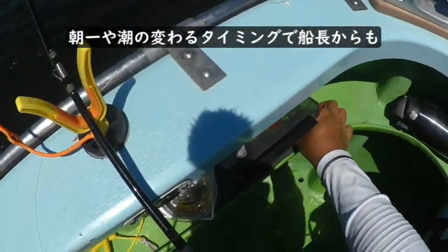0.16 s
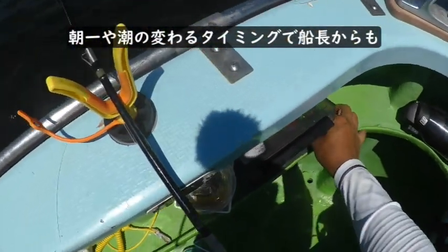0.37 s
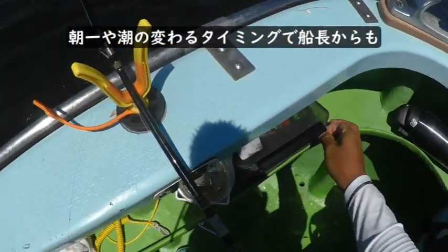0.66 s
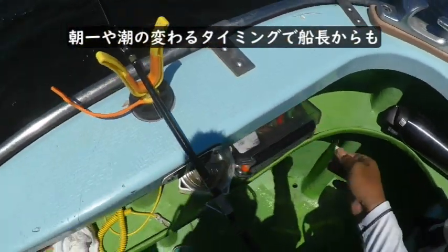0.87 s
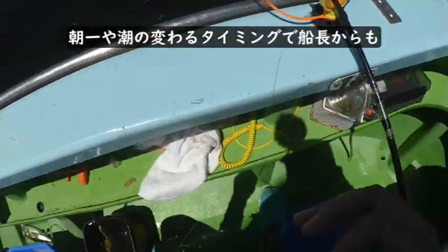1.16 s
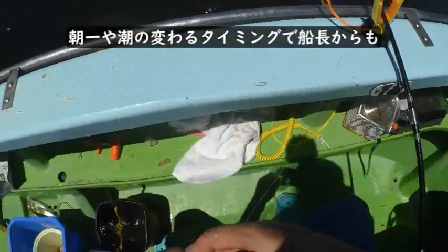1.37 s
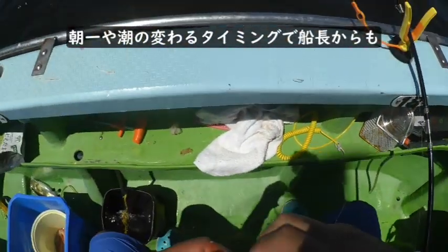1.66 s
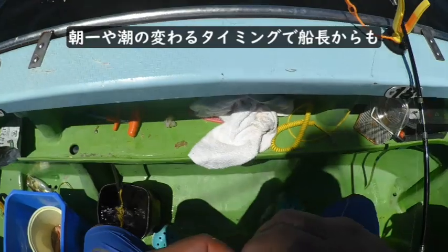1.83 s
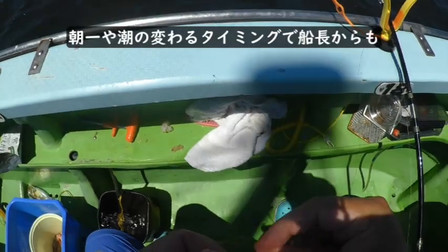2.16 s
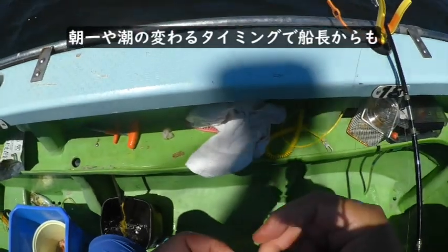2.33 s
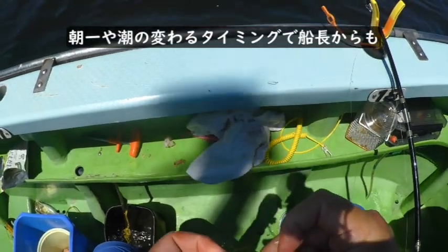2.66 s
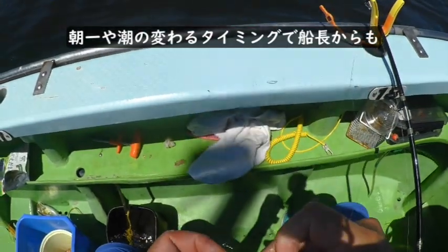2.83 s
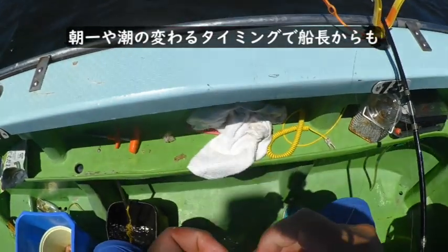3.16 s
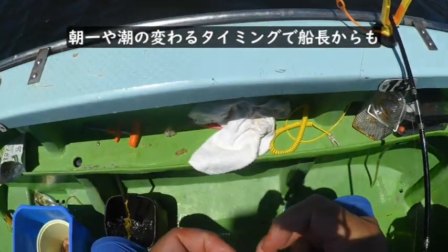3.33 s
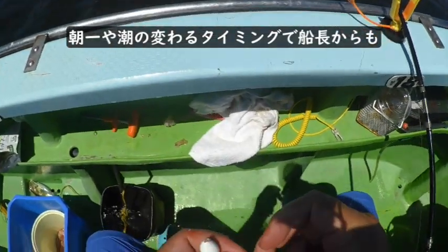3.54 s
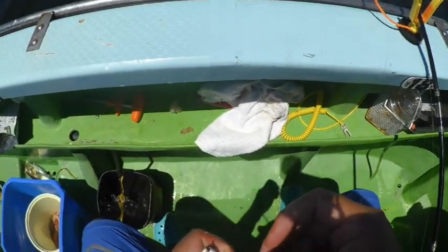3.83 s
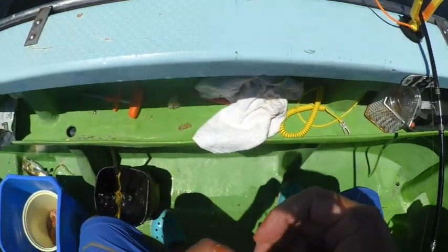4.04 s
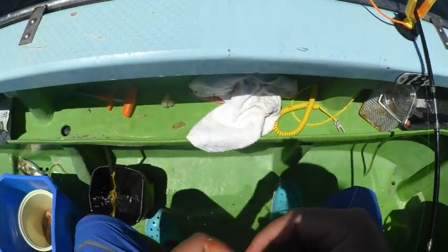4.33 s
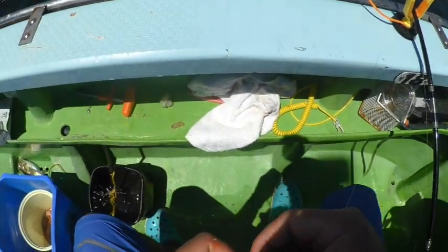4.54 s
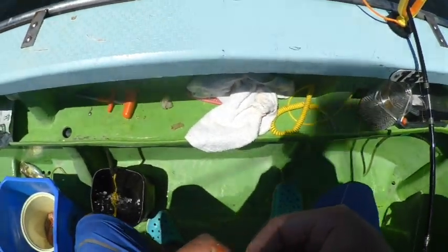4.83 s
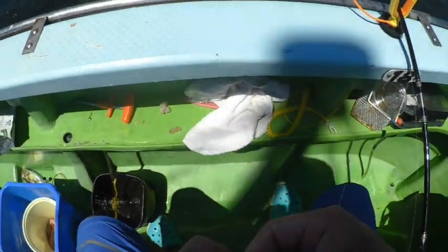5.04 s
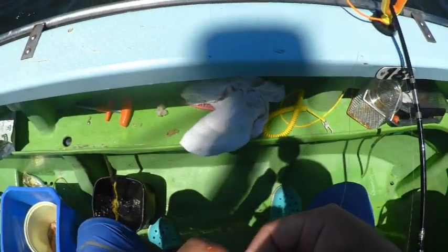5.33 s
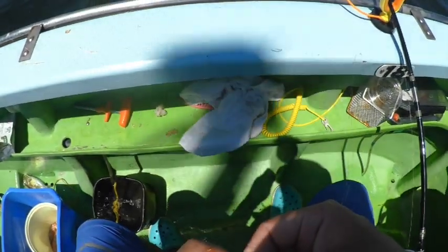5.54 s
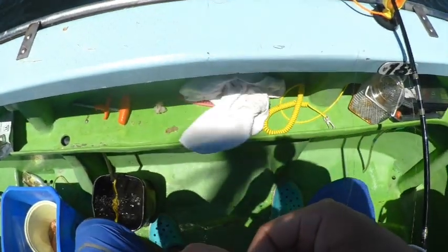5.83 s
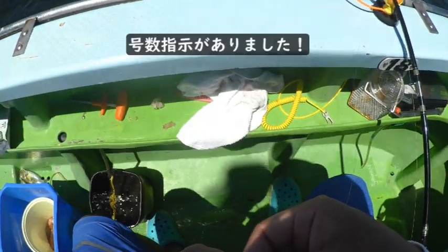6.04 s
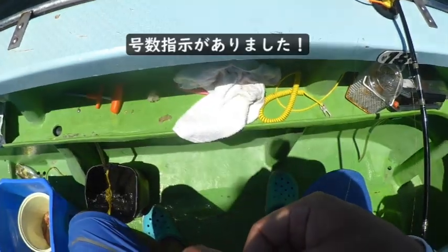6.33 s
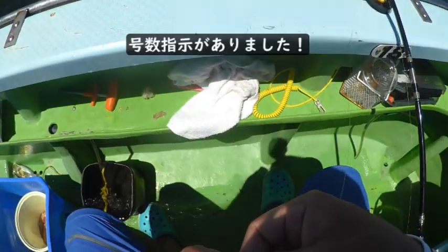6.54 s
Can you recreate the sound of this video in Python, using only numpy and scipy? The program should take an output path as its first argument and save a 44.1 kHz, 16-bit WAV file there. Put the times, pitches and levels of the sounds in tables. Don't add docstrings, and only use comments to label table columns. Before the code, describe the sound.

A low marine diesel idle runs unbroken, humming and chattering about twenty-six times a second, with a steady pump hum beneath. Over it, hard little knocks of lead and plastic, dull deck thumps and brief scuffs arrive in groups, early, midway and late, with a few soft water glugs. Close, dull, mono sound from a sealed camera on the head; the top end dims and returns.

```python
import sys
import numpy as np
from scipy import signal
from scipy.fft import rfft, irfft, next_fast_len
from scipy.io import wavfile
from scipy.ndimage import uniform_filter1d, map_coordinates

SR = 44100
rng = np.random.default_rng(int(sys.argv[2]) if len(sys.argv) > 2 else 0)


def volts_from_db(level):
    exponent = np.asarray(level, float) / 20
    return 10 ** exponent


def waveform_to_disk(signal):
    frames = np.transpose(np.atleast_2d(signal))
    scaled = np.clip(frames, -1, 1) * 32767
    samples = np.round(scaled).astype(np.int16)
    wavfile.write(sys.argv[1], SR, samples)


N = 295029


def unit(x):
    return x / np.sqrt(np.mean(x ** 2) + 1e-20)


def curves(rows):
    s, *cols = np.transpose(rows)
    return [np.interp(np.arange(N) / SR, s, c) for c in cols]


def wobble(rate):
    knots = rng.standard_normal(int(N * rate / SR) + 4)
    return map_coordinates(knots, [np.arange(N) * rate / SR])


def filtered(x, response):
    m = next_fast_len(N + 8192)
    return irfft(rfft(x, m) * response(np.fft.rfftfreq(m, 1 / SR)), m)[..., :N]


def coloured(x, points):
    f, v = np.transpose(points)
    return unit(filtered(x, lambda hz: volts_from_db(np.interp(np.log(hz + 1), np.log(f), v))))


def peak(hz, centre_hz, width_hz):
    return 1j * hz * width_hz / (centre_hz ** 2 - hz ** 2 + 1j * hz * width_hz)


def patchy(depth_db):
    z = signal.stft(rng.standard_normal(N), nperseg=512)[2]
    field = uniform_filter1d(rng.standard_normal(z.shape), size=5, axis=0)
    field = uniform_filter1d(field, size=8, axis=1)
    return signal.istft(z * volts_from_db(depth_db * unit(field)), nperseg=512)[1][:N]


def tone(cycles, db):
    return np.sqrt(2) * volts_from_db(db) * np.cos(2 * np.pi * cycles)


def opening():
    # t/s, level/dB
    facing = [(0.0, -68), (0.4, -65), (0.75, -70.5), (1.02, -70.5), (1.3, -64.5), (1.5, -62.5),
              (2.1, -65.5), (2.75, -66), (2.98, -73), (3.32, -73), (3.7, -71.5), (3.8, -63.5), (4.2, -63),
              (4.55, -61.5), (4.9, -66), (5.65, -74), (6.36, -73), (6.43, -66), (6.69, -63)]
    return curves(facing)[0] + 68


def glugs():
    # t/s, peak level/dB, first f/Hz, last f/Hz, length/s
    bubbles = [
        (0.478, -18.5, 240, 420, .045),
        (2.345, -26.5, 285, 700, 0.059),
        (3.051, -24, 295, 450, 0.034),
        (6.402, -22.5, 770, 616, 0.023),
        (6.608, -31, 840, 700, .02),
    ]
    out = np.zeros(N + SR)
    for s, db, from_hz, to_hz, length in bubbles:
        n = round(length * SR)
        cycles = np.cumsum(np.geomspace(from_hz, to_hz, n)) / SR
        out[round(s * SR):][:n] += volts_from_db(db) * np.hanning(n) * np.sin(2 * np.pi * cycles)
    return out[:N]


def scuffs():
    # t/s, length/s, rms level/dB
    drags = [(0.289, .05, -31), (0.472, 0.11, -24.5), (1.54, .08, -32), (2.339, .07, -30.5),
             (3.699, 0.12, -24.5), (3.949, .12, -28), (5.09, .08, -32), (6.165, 0.086, -30),
             (6.385, .07, -28), (6.462, 0.055, -32.5), (6.601, .09, -30.5)]
    # f/Hz, level/dB per Hz
    friction = [(80, -30), (150, -3.5), (350, 2.5), (700, -9.5), (1300, -17), (2200, -22), (3000, -35),
                (3800, -70)]
    swell = np.zeros(N + SR)
    for s, length, db in drags:
        n = round(length * SR)
        swell[round(s * SR):][:n] += volts_from_db(db) * np.hanning(n)
    swell = swell[:N]
    grainy = swell * volts_from_db(4.6 * wobble(140))
    return coloured(grainy * rng.standard_normal(N), friction) * np.sqrt(np.mean(swell ** 2))


def thumps():
    # t/s, peak level/dB, f/Hz, length/s
    contacts = [(0.301, -19, 531, 0.038), (.432, -21.5, 248, 0.038), (0.477, -16.5, 260, 0.028),
                (0.5, -16, 345, .03), (0.507, -15.5, 137, 0.032), (.485, -21, 920, 0.025),
                (0.527, -18, 558, 0.029), (.524, -16.5, 222, 0.025), (0.738, -31.5, 267, 0.062),
                (0.763, -31.5, 802, .12), (.9, -32, 900, .12), (1.468, -34, 142, 0.086),
                (1.574, -17.5, 330, 0.05), (1.955, -29, 746, 0.041), (2.355, -20, 369, 0.036),
                (2.585, -28, 240, .03), (3.06, -21.5, 384, 0.042), (3.695, -25, 490, 0.026),
                (3.714, -14.5, 302, .035), (3.715, -19, 435, 0.032), (3.74, -18, 395, 0.03),
                (3.741, -31, 728, 0.042), (3.755, -15, 142, 0.045), (3.762, -15, 271, 0.039),
                (3.795, -19.5, 162, 0.056), (3.86, -26.5, 133, 0.067), (4.003, -17.5, 280, .03),
                (4.03, -17.5, 190, 0.039), (6.178, -18, 537, 0.025), (6.203, -20.5, 499, 0.037),
                (5.07, -21, 555, .04), (5.09, -20, 351, .03), (6.4, -28, 686, 0.028),
                (6.45, -24, 187, 0.075), (6.6, -29, 840, 0.026), (6.62, -23.5, 132, 0.066),
                (6.655, -18.5, 253, 0.042)]
    out = np.zeros(N + SR)
    for s, db, hz, length in contacts:
        n = round(length * SR)
        push = np.sin(2 * np.pi * hz * np.arange(n) / SR)
        push += 2.2 * rng.standard_normal(SR // 8)[:n]
        band = signal.butter(2, [hz * .62, hz * 1.7], "bandpass", fs=SR, output="sos")
        ring = signal.sosfilt(band, np.pad(push * np.hanning(n), (0, SR // 10)))
        out[round(s * SR):][:len(ring)] += volts_from_db(db) * ring / np.abs(ring).max()
    return out[:N]


def tackle():
    # t/s, peak level/dB, f/Hz, t60/s, edge level/dB
    knocks = [(0.084, -25, 880, 0.041, -67), (0.131, -24, 1660, 0.051, -50), (0.23, -17, 2200, 0.028, -53),
              (.311, -15, 1380, 0.041, -54), (0.339, -20, 2040, 0.034, -56), (0.4, -34, 2600, 0.021, -54),
              (0.499, -29, 1010, 0.071, -65), (0.516, -21, 1500, 0.06, -58.5),
              (0.531, -21, 1872, 0.074, -42.5), (.563, -18, 1660, 0.03, -44),
              (0.688, -33, 2555, 0.016, -62), (0.744, -23, 1460, 0.026, -39), (0.761, -34, 600, 0.036, -71),
              (.879, -35, 825, 0.025, -75), (1.973, -28, 900, 0.039, -65), (2.326, -32, 1920, 0.052, -47.5),
              (3.52, -29, 2050, .035, -68), (3.748, -30, 1150, 0.045, -60),
              (3.783, -23.5, 1430, 0.074, -54), (4.03, -17, 1014, 0.053, -64),
              (4.242, -14, 1570, 0.019, -48), (5.107, -26, 1690, 0.028, -63.5),
              (5.125, -26.5, 1860, .04, -66), (5.153, -25, 1450, 0.041, -69),
              (5.221, -24, 1600, 0.044, -67), (5.929, -36, 1950, 0.052, -52),
              (6.095, -29, 1960, 0.033, -67), (6.132, -25, 1390, 0.05, -72), (6.181, -24, 1720, 0.029, -63),
              (6.196, -23, 1680, .03, -68), (6.401, -29, 1770, .03, -62), (6.475, -25, 1740, .03, -64),
              (6.422, -21, 1320, 0.032, -45)]
    # f/Hz, level/dB per Hz
    edge_colour = [(4000, -35.5), (5200, -3), (6500, 4.5), (8000, -5.5), (10000, -12), (12000, -10),
                   (16000, -6)]
    out, edges, t = np.zeros(N + SR), np.zeros(N + SR), np.arange(SR // 10) / SR
    for s, db, hz, t60, edge_db in knocks:
        modes = 0
        for ratio, level in [(1, -5), (1.27, -12), (1.62, -22)]:
            level = level + 1.4 * rng.standard_normal()
            modes = modes + volts_from_db(level) * np.sin(2 * np.pi * hz * ratio * t)
        band = signal.butter(2, [hz * .75, hz * 1.45], "bandpass", fs=SR, output="sos")
        rattle = .5 * unit(signal.sosfilt(band, rng.standard_normal(len(t))))
        decay = volts_from_db(db - 60 * t / t60) * (1 - np.exp(-t / .002))
        out[round(s * SR):][:len(t)] += decay * (modes + rattle)
        edges[round(s * SR):][:len(t)] += volts_from_db(edge_db - 60 * t / 0.021) * rng.standard_normal(len(t))
    edges = edges[:N]
    dulled = filtered(out, lambda hz: 1 / (1 + (hz / 2900) ** 12))
    return dulled + np.std(edges) * coloured(edges, edge_colour)


def pump():
    # f/Hz, rms level/dB
    lines = [(62.78, -35.5), (125.55, -36), (140.33, -35), (188.28, -45)]
    t = np.arange(N) / SR - .0029
    return sum(tone(hz * t + 0.043 * wobble(1.74), db + 2.13 * wobble(2.714)) for hz, db in lines)


def hull(turns):
    # multiple of the shaft speed, rms level/dB
    orders = [(3, -41), (4, -58.5), (4.5, -43), (5, -33.5), (5.5, -72), (6, -26.5), (7, -41), (7.5, -43.5),
              (8, -45), (9, -42), (12, -36.5), (14, -46.5), (15, -43.5), (18, -42), (21, -45), (24, -50.5),
              (25, -38.5), (26, -44.5), (27, -40), (28, -50), (29, -42.5), (30, -44), (33, -43), (34, -45),
              (36, -45)]
    crest = turns - .205
    hum = 0
    for k, db in orders:
        phase = (k == 9) / 2 + (k > 12) * rng.random() + 0.0047 * k * wobble(1.525)
        hum = hum + tone(k * crest + phase, db + 0.093 * k * wobble(2.732))
    return hum


def gears(turns, levels_db):
    mesh = turns - .15 + .003 * wobble(2)
    whine = 0
    for k, db in zip([63, 66, 69], levels_db):
        jitter = 0.07 * wobble(1.5) + 0.05 * wobble(11)
        whine = whine + tone(k * mesh + jitter, db + 1.5 * wobble(9))
    return whine


def rumble(open_db):
    # f/Hz, level/dB per Hz
    low_colour = [(14, -46), (27, -15.5), (40, 0), (60, -2.5), (90, -6.5), (135, -3), (170, -8), (260, -4),
                  (400, -7), (620, -12), (900, -26), (1500, -64)]
    return volts_from_db(-28.5 + 0.024 * open_db + 0.38 * wobble(7.7)) * coloured(patchy(0.7), low_colour)


def firing(turns, rise, fall, scatter_db):
    cylinders_db = [-7, -2.5, -3, -6, -3.5, -4]
    count = 3 * (turns - .06) + 6
    which, since = count.astype(int), count % 1
    chance = rng.standard_normal(which[-1] + 1)[which]
    size_db = np.take(cylinders_db, which % 6) + scatter_db * chance
    return volts_from_db(size_db) * (1 - np.exp(-since / rise)) * np.exp(-since / fall)


def combustion(turns, open_db):
    # f/Hz, width/Hz, level/dB
    block = [(780, 45, -1), (890, 50, -3), (1040, 55, -1), (1185, 35, 1.5), (1308, 30, 1.5)]
    # f/Hz, level/dB per Hz
    clatter_colour = [(250, -49), (500, 1.5), (800, -0.5), (1100, -2.5), (1600, -7), (2300, -10.5),
                      (3000, -20.5), (3600, -31.5), (4200, -59), (5000, -65)]
    bright_colour = [(900, -63.5), (1600, 3), (2300, -5), (3000, -3.5), (3600, -15), (4200, -31),
                     (5000, -63)]
    tick_colour = [(3500, -30), (4500, -2), (5200, -3), (6900, 0), (7800, -5), (9200, -10), (9900, -5),
                   (10600, -12), (13000, -14), (15000, -8), (16000, -9)]

    knock = firing(turns, rise=0.065, fall=0.35, scatter_db=1.5)
    crack = firing(turns, rise=.03, fall=.09, scatter_db=1.6)
    valve = volts_from_db(-9.5) * firing(turns - .55 / 3, rise=.03, fall=.08, scatter_db=2.5)

    def body(hz):
        return sum(volts_from_db(db) * peak(hz, c, w) for c, w, db in block)

    burst = (1.0 + knock + 0.58 * crack + valve) * patchy(1.18)
    clatter = coloured(filtered(burst, lambda hz: 1 + 0.47 * body(hz)), clatter_colour)
    ring = coloured(filtered(crack * rng.standard_normal(N), body), clatter_colour)
    bright = coloured((0.18 + 0.46 * knock + 1.6 * crack + valve) * patchy(0.67), bright_colour)
    ticks = coloured((0.15 + knock + 0.46 * crack + 0.5 * valve) * patchy(0.45), tick_colour)
    out = volts_from_db(-34 + 0.35 * open_db) * clatter
    out += volts_from_db(-48 + 0.73 * open_db) * ring
    out += volts_from_db(-49.5 + open_db) * bright
    return out + volts_from_db(-63 + open_db) * ticks


def engine():
    # t/s, turns per s
    shaft = [(0.0, 8.853), (0.5, 8.85), (1.0, 8.831), (1.5, 8.81), (2.0, 8.81), (2.5, 8.826), (3.0, 8.821),
             (3.5, 8.821), (4.0, 8.833), (4.5, 8.848), (5.0, 8.847), (5.5, 8.825), (6.0, 8.819),
             (6.5, 8.821), (6.69, 8.821)]
    # t/s, hum swell level/dB, rms level/dB of the three gear lines
    roll = [(0, 1, -38, -32, -35), (.4, 0.5, -36, -36.5, -38), (.7, -1.5, -35, -38.5, -37),
            (1, 2.5, -46, -33, -39), (1.3, 1, -38, -42.5, -44), (1.6, 1, -44, -43, -54),
            (2, -2, -38, -38.5, -52), (2.3, -2.5, -41, -42, -56), (2.8, -2, -46, -32.5, -44),
            (3.1, .5, -50.5, -36.5, -46), (3.6, 0.5, -35, -42, -47), (3.9, 1.5, -40, -44, -42),
            (4.25, 1.5, -33, -37, -45), (4.7, -0.5, -44, -47, -47), (5.1, -1.5, -34, -42, -49),
            (5.5, -2, -44, -38, -42), (6, -2, -37, -37.5, -51.5), (6.4, 2.5, -36.5, -48.5, -49),
            (6.69, 3, -38, -38, -48)]
    turns = np.cumsum(curves(shaft)[0]) / SR
    open_db = opening()
    roll_db, *whine_db = curves(roll)
    tonal = volts_from_db(roll_db) * hull(turns) + gears(turns, whine_db)
    return tonal + rumble(open_db) + combustion(turns, open_db)


def scene():
    return (glugs() + scuffs() + thumps() + tackle() + pump() + engine())[None]


def electronics():
    # f/Hz, level/dB per Hz
    hiss_colour = [(3000, -34), (5900, -30), (7000, -18), (10000, -17), (12800, -16), (14000, -6),
                   (15000, -.4), (16000, -1)]
    t = np.arange(N) / SR
    comb = 0
    for k in range(112, 132):
        comb = comb + tone((k * 119.87 - 10.7) * t + rng.random(), -94 + 2 * rng.standard_normal())
    return comb + volts_from_db(-64.0 + .2 * opening()) * coloured(rng.standard_normal(N), hiss_colour)


def sealed_port(x):
    # f/Hz, width/Hz
    port_dips = [(4580, 1000), (5680, 1300)]
    return filtered(x, lambda hz: np.prod([1 - .93 * peak(hz, c, w) for c, w in port_dips], axis=0))


def roll_off(x):
    return signal.sosfilt(signal.butter(12, 15800, fs=SR, output="sos"), x)


def record(dry):
    samples = np.arange(N)
    fade = np.clip((N - samples) / (.004 * SR), 0, 1)
    swing = volts_from_db(-16.5) * np.exp(-2 * samples / SR / .0006 / 2)
    swing = swing * np.exp(-samples / SR / .0006 * 0)
    return roll_off(fade * (sealed_port(dry) + electronics() + swing))


dry = scene()
out = record(dry)
waveform_to_disk(out)
```